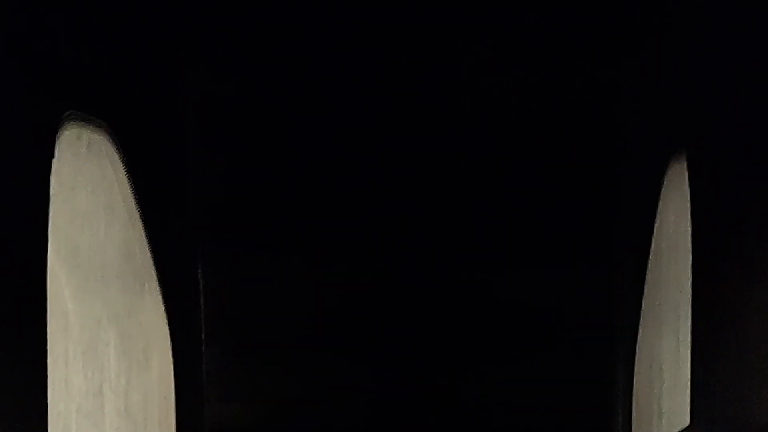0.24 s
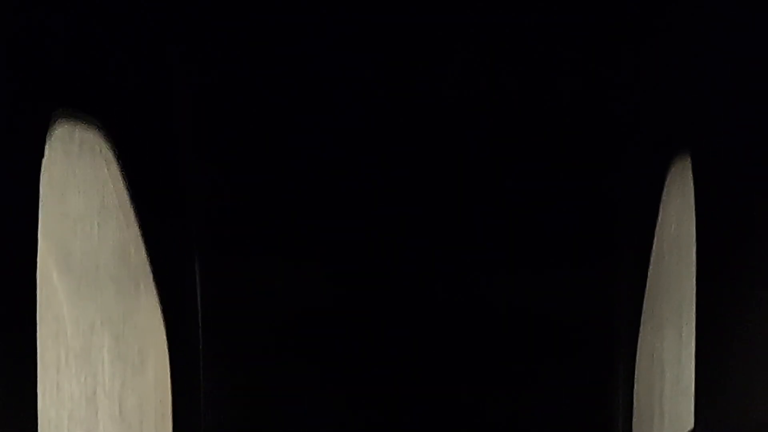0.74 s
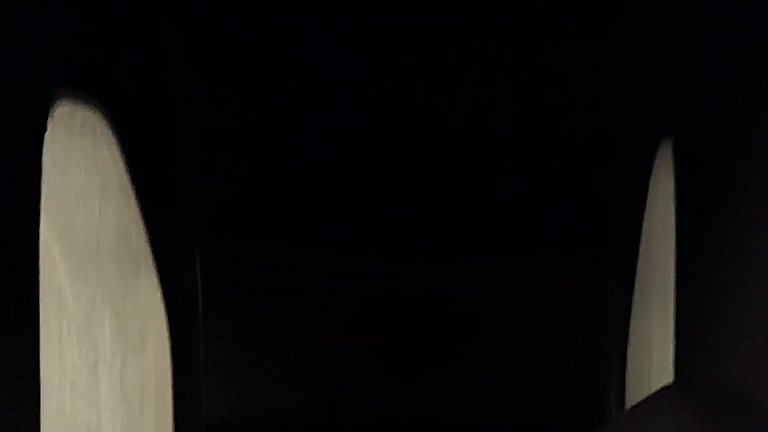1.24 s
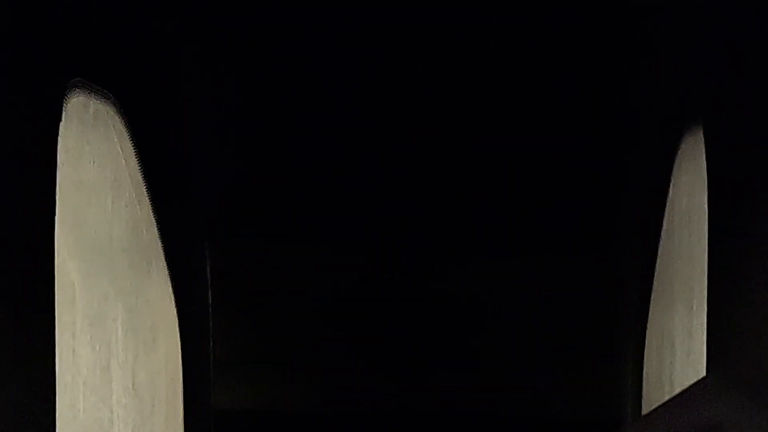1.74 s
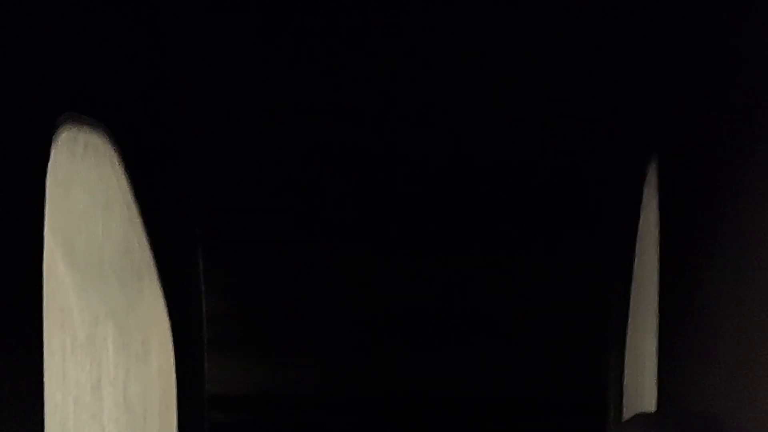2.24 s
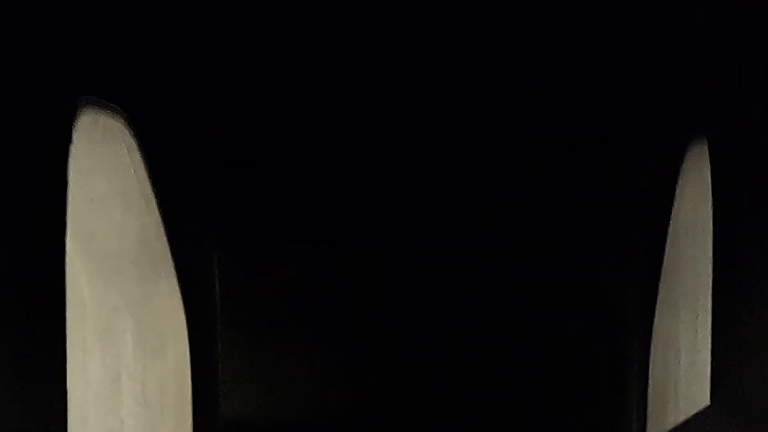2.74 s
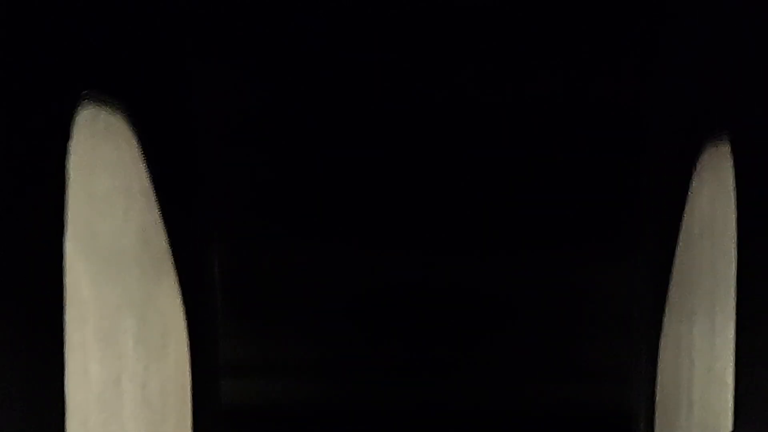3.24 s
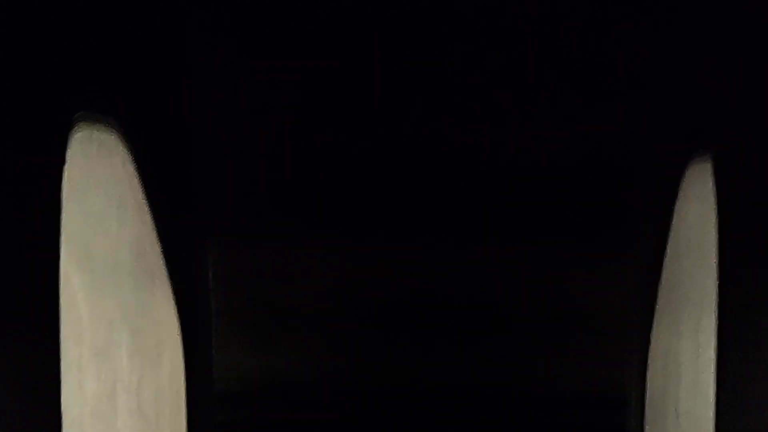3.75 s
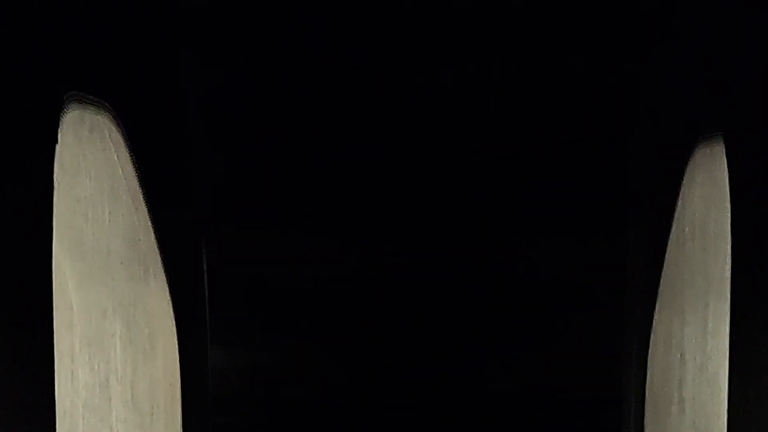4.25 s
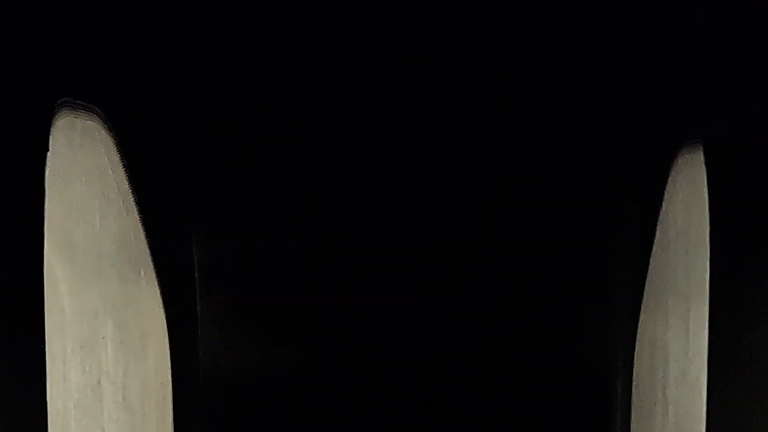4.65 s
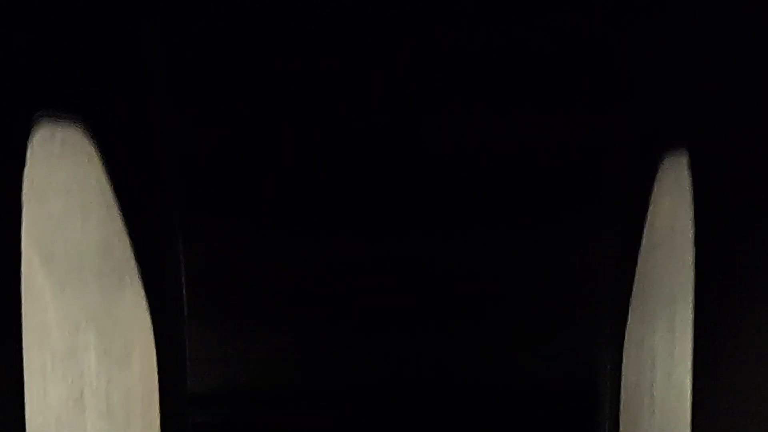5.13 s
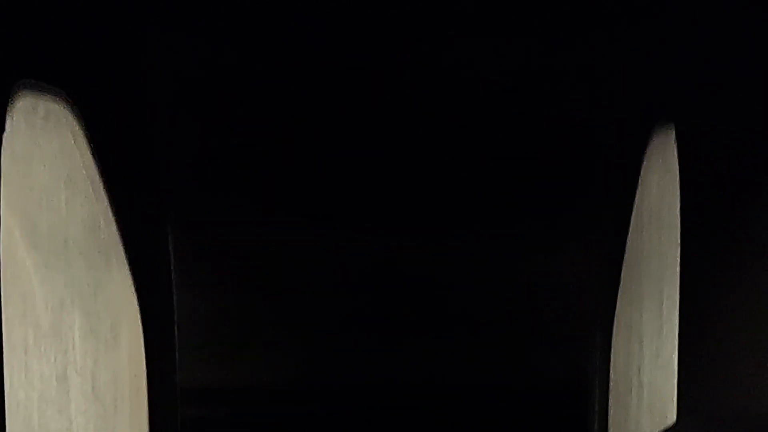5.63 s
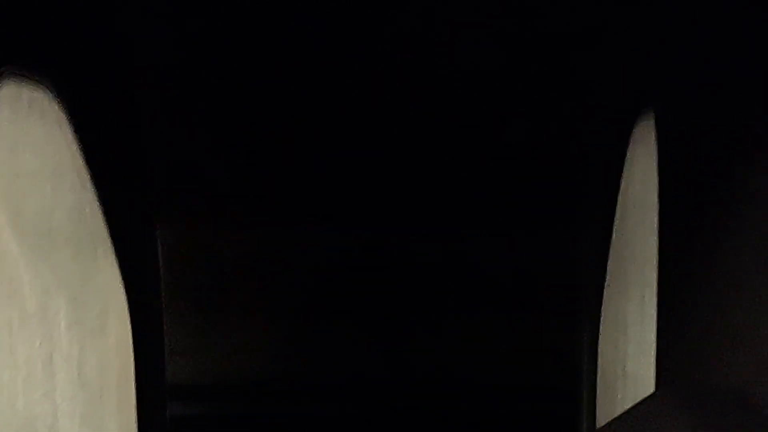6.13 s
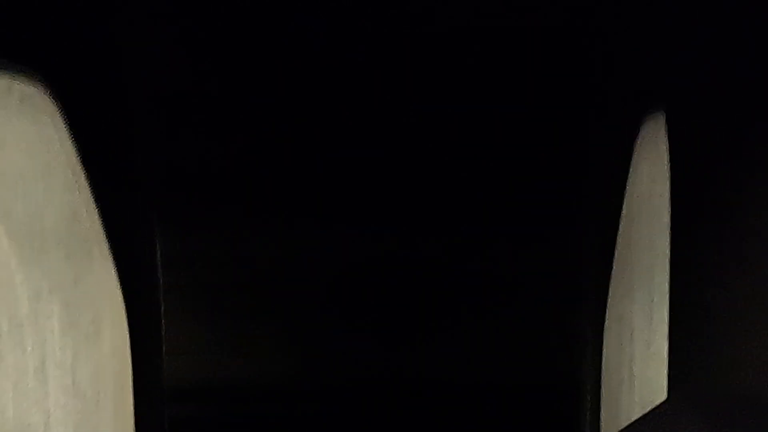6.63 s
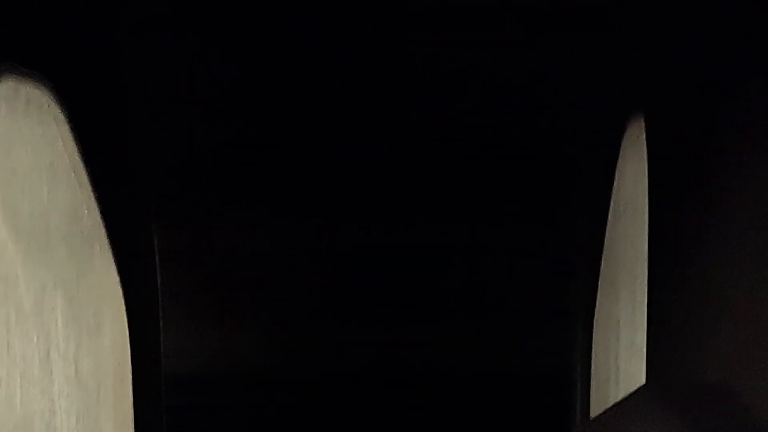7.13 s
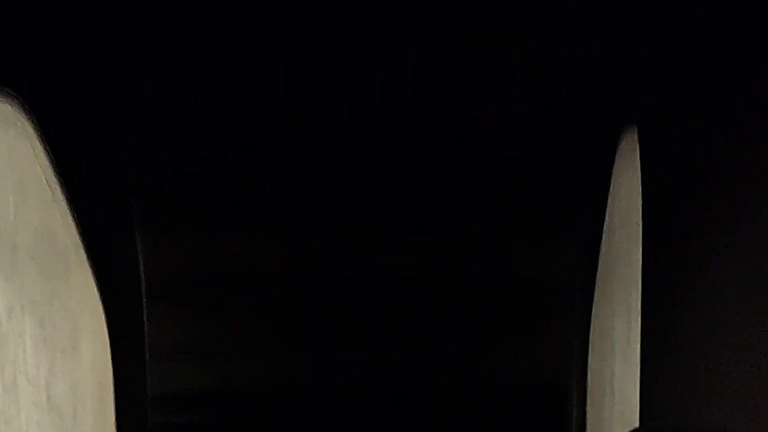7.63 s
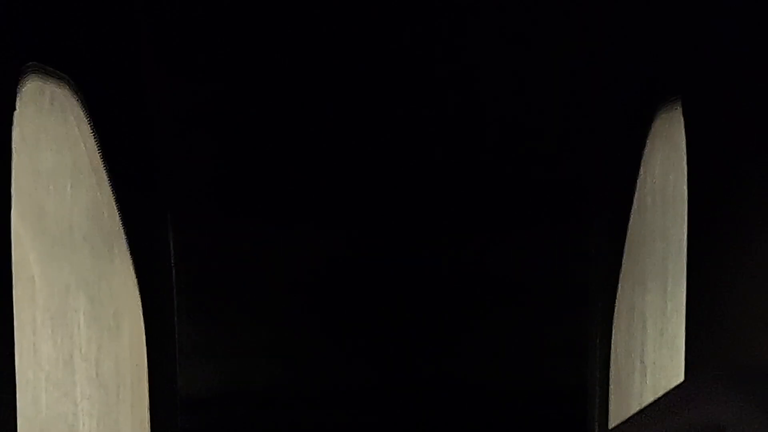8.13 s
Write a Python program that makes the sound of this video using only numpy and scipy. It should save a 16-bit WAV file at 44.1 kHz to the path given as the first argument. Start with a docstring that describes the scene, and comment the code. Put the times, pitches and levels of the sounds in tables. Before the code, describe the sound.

A train car interior rushing through a dark tunnel, deep bogie rumble, steady roar, wavering metallic whine, motor hum and sharp loose rattles.

```python
"""Bogie rumble and tunnel roar fill a subway car running at speed: shaped noise that rises and falls in short swells.
The floor drums, car body resonances boom, and rough rail excites wheel ring, contact hiss and short sung streaks.
A thin fluttering drive whine holds near 1.9 kHz over a grainy motor hum and a rail drone in narrow noise bands.
Hollow howls, also narrow noise bands, swell and fade; loose fittings rattle as noise cracks and short buzzes."""
import sys
import numpy as np
from scipy import signal
from scipy.fft import rfft, irfft, next_fast_len
from scipy.io import wavfile
from scipy.ndimage import uniform_filter1d, minimum_filter1d

SR = 44100
rng = np.random.default_rng(int(sys.argv[2]) if len(sys.argv) > 2 else 0)


def materialize(psi):
    """Save the field psi as 16-bit PCM at rate SR to the path in sys.argv[1].

    A 1-D psi becomes a single channel; in a 2-D psi each row is a channel.
    """
    bounded = np.clip(np.atleast_2d(psi).T, -1, 1)
    quanta = np.round(bounded * 32767).astype(np.int16)
    wavfile.write(sys.argv[1], SR, quanta)


N = 369558
TIME = np.arange(N) / SR  # s
FFT_SIZE = 2 * next_fast_len(N // 2 + 1, real=True)
BIN_HZ = np.maximum(np.arange(FFT_SIZE // 2 + 1) * SR / FFT_SIZE, 1)


def from_db(db):
    """Decibels to gain."""
    return 10 ** (np.asarray(db) / 20)


def rms_one(x):
    """Scale to unit power."""
    return x / np.sqrt(np.mean(x ** 2) + 1e-20)


def filtered(x, gain):
    """Apply a gain at each frequency."""
    return irfft(rfft(x, FFT_SIZE) * gain, FFT_SIZE)[:N]


def noise(gain):
    """Unit-power noise shaped by a gain at each frequency."""
    return rms_one(filtered(rng.standard_normal(FFT_SIZE), gain))


def colour(points):
    """Gain at each frequency from a short spectrum; silent above its last point."""
    hz, db = np.transpose(points)
    return from_db(np.interp(np.log(BIN_HZ), np.log(hz), db, right=-np.inf))


def resonance(hz, width_hz):
    """Gain of a steep-sided resonance, 12 dB down at width_hz either side."""
    return 1 / (1 + ((BIN_HZ - hz) / width_hz) ** 2) ** 2


def drift(rate_hz):
    """Low-passed random fluctuation with spread 1."""
    return noise(resonance(0, rate_hz))


def steadied(x, seconds, share):
    """Take a share of the chance swells out of a noise, so that its drive sets the level."""
    power = uniform_filter1d(x ** 2, max(int(seconds * SR), 1))
    power = uniform_filter1d(power, size=600) + 1e-9
    return rms_one(x / power ** (np.clip(share, 0, 1) / 2))


def in_time(rows):
    """One curve per column, joined by straight lines."""
    s, *columns = np.transpose(rows)
    return [np.interp(TIME, s, c) for c in columns]


def level(rows, offset_db):
    """Gain over time from a level curve and an offset in dB."""
    return from_db(in_time(rows)[0] + offset_db)


def swell(middle_s, half_s):
    """A smooth rise and fall, 1 at its middle."""
    return np.cos(np.pi / 2 * np.clip((TIME - middle_s) / half_s, -1, 1))


def narrow_band(hz, width_hz):
    """Noise in a narrow band around a pitch that may move."""
    phase = 2 * np.pi * np.cumsum(hz) / SR
    return drift(width_hz) * np.cos(phase) + drift(width_hz) * np.sin(phase)


def tone(hz, waver_hz, flutter_db):
    """A wavering tone of unit power; shifting tunnel reflections make it flutter."""
    phase = 2 * np.pi * np.cumsum(hz + waver_hz * drift(26.1)) / SR
    return rms_one(np.sin(phase) * from_db(flutter_db * drift(20)))


# hollow howls and booms:
# (middle [s], half length [s], pitch [Hz], glide [Hz/s], width [Hz], level [dB])
HOWLS = [(1.15, 0.59, 1185, -0.5, 82, -34.5), (1.45, 0.91, 300, 0, 110, -25.5),
         (4.83, 0.46, 655, -1.5, 40, -31), (4.96, 0.8, 1218, -25, 22, -38),
         (5.31, 0.23, 195, 1, 134, -21.5), (6.2, .6, 1100, -200, 190, -36),
         (7.33, 1.9, 975, -0.5, 110, -32.5), (6.85, 0.38, 950, -2, 14, -33),
         (7.75, 0.398, 1010, 0, 160, -34.5), (7.347, 0.422, 170, 0, 31, -24.5)]


def howls():
    """Some stretches of tunnel howl in a narrow band, which may slide down as the train runs through."""
    out = 0
    for middle_s, half_s, hz, glide_hz_per_s, width_hz, db in HOWLS:
        pitch_hz = hz + glide_hz_per_s * np.clip(TIME - middle_s, -half_s, half_s)
        band = steadied(narrow_band(pitch_hz, width_hz), seconds=0.11, share=0.42)
        out = out + from_db(db) * swell(middle_s, half_s) * band
    return out


# motor hum: (time [s], pitch [Hz], level [dB])
MOTOR_HUM = [(0, 581, -32), (0.9, 581, -33.5), (1.5, 581, -37), (3.7, 583, -37), (4.5, 585, -31.5),
             (5.3, 585, -44), (6.2, 587, -32.5), (7.2, 587, -39), (7.7, 588, -28), (8.38, 587, -44)]


def motor_hum(level_db, width_hz):
    """The motors hum on a narrow line that tunnel reflections break into grains."""
    hz, db = in_time(MOTOR_HUM)
    return from_db(db + level_db) * steadied(narrow_band(hz, width_hz), seconds=.2, share=.8)


# gear mesh whine: (time [s], pitch [Hz], level [dB])
DRIVE_WHINE = [(0, 1870, -44), (1.2, 1873, -38.5), (2.85, 1873, -36.5), (3.3, 1890, -41), (4.1, 1876, -43),
               (4.5, 1876, -32.5), (5.0, 1867, -35), (6.2, 1887, -39.5), (6.7, 1866, -34), (7.1, 1887, -48),
               (7.7, 1896, -37), (8.38, 1880, -49)]


def drive_whine(waver_hz, flutter_db):
    """Gear teeth mesh at a pitch tied to speed."""
    hz, db = in_time(DRIVE_WHINE)
    return from_db(db) * tone(hz, waver_hz, flutter_db)


# jolts of loose fittings: (time [s], crack [dB], buzz [dB], buzz t60 [s])
RATTLES = [(0.382, -28, -31, .05), (0.695, -25, -29, .05), (1.064, -24, -26, .08), (1.119, -27, -25, 0.089),
           (1.555, -28, -25, .06), (1.588, -20, -23.5, .07), (2.492, -23, -28, .04), (3.09, -29, -26, .07),
           (3.328, -29, -25, .06), (3.382, -24, -25, .06), (3.448, -20, -30, .04), (3.841, -23, -25, .05),
           (3.897, -19, -31, .04), (4.11, -26, -19, .05), (4.201, -24, -27, .04), (5.083, -22, -26, .08),
           (6.471, -27, -24, .07), (6.86, -20, -28, .07), (6.984, -25, -25, .07), (7.037, -23, -26, .036),
           (7.058, -12, -25, 0.076), (7.062, -22, -30, .03), (7.077, -27, -30, .04),
           (7.0871, -15, -28, 0.031), (7.282, -20, -29, .07), (7.504, -22, -26, 0.076)]
# resonances of the fittings: (frequency [Hz], width [Hz], level [dB])
FITTING_MODES = [(1350, 640, 13), (2620, 880, 4), (3790, 390, -7.5), (4800, 520, -10.5), (5960, 520, -19),
                 (7900, 1400, -35)]


def rattles(buzz_db, crack_db, crack_t60_s, crack_tilt_db_per_octave):
    """Each jolt starts with a bright crack and sets off a short buzz of contacts in the fittings."""
    crack_env, buzz_env = np.zeros((2, N))
    after_s = TIME[:SR // 4]
    for s, crack, buzz, buzz_t60_s in RATTLES:
        start = int(s * SR)
        span = slice(start, start + len(after_s))
        crack_env[span] += from_db(crack + crack_db - 60 * after_s / crack_t60_s)
        buzz_env[span] += from_db(buzz + buzz_db - 60 * after_s / buzz_t60_s)
    modes = sum(from_db(db) * resonance(hz, width_hz) for hz, width_hz, db in FITTING_MODES)
    bright = modes * from_db(crack_tilt_db_per_octave * np.log2(BIN_HZ))
    cracks = filtered(crack_env * rng.standard_normal(N), rms_one(bright))
    buzzes = filtered(buzz_env * rng.standard_normal(N), rms_one(modes))
    return cracks + buzzes


# rippled rail, louder on worn stretches: (time [s], level [dB])
CORRUGATION_LEVEL = [(0, -41), (.45, -28.5), (1.5, -40), (2.5, -33.5), (3.6, -52), (4.65, -18.5),
                     (5.4, -43), (6.4, -34), (7.2, -44), (7.7, -28.5), (8.3, -27)]
CORRUGATION_HZ, CORRUGATION_WIDTH_HZ = 583, 95


def rail_drone(level_db):
    """Ripples on the rail head shake the wheels in a narrow, wavering band."""
    band = noise(resonance(CORRUGATION_HZ, CORRUGATION_WIDTH_HZ))
    return level(CORRUGATION_LEVEL, level_db) * steadied(band, seconds=0.068, share=0.67)


# wheel modes that sing out: (frequency [Hz], level [dB])
WHEEL_MODES = [(1805, -44), (1855, -41.5), (1905, -40), (1955, -41.5)]
# wheel ring, also used by wheels(): (time [s], level [dB])
RING_LEVEL = [(0.0, -25), (0.3, -25), (0.6, -27.5), (0.9, -24.5), (1.2, -26.5), (1.4, -24.5), (1.6, -27),
              (2.2, -24.5), (3.3, -24.5), (4.3, -25.5), (4.5, -24.5), (5.2, -25.3), (6.6, -25),
              (7.3, -26.5), (8.3, -26)]


def wheel_song(level_db, waver_hz, flutter_db):
    """Each wheel mode flares up briefly by itself, more strongly while the wheels ring loudly."""
    ring_db, = in_time(RING_LEVEL)
    song = sum(from_db(db) * tone(hz, waver_hz, flutter_db) for hz, db in WHEEL_MODES)
    return from_db(level_db + ring_db - ring_db.mean()) * song


# relative spectra of tunnel roar, wheel ring, contact hiss: (frequency [Hz], density [dB per Hz])
ROAR_SPECTRUM = [(200, -2), (340, -1.5), (440, -2.5), (560, -0.5), (780, -0.5), (900, -4), (1030, -6.5),
                 (1230, -7), (1450, -12.5), (1700, -18), (2400, -26.5), (5000, -69)]
RING_SPECTRUM = [(900, -34), (1400, -20.5), (1600, -5), (1760, -0.5), (1900, -1.5), (1980, 0), (2090, -5),
                 (2200, -10), (2400, -15), (3000, -41.5), (6000, -74)]
HISS_SPECTRUM = [(1200, -15), (2300, 0), (2800, 0), (3300, -1.5), (3750, 1), (4100, -6), (4550, -13),
                 (5200, -15.5), (5900, -16.3), (6700, -23), (7900, -27.7), (9100, -37.5), (11200, -45),
                 (12800, -53)]
# tunnel roar and contact hiss along the line: (time [s], level [dB])
ROAR_LEVEL = [(0.0, -20.5), (0.4, -18.5), (1.3, -19), (2.5, -19), (3.1, -20), (4.4, -20), (4.7, -20.5),
              (5.3, -20), (5.9, -19), (7.4, -20), (7.7, -19), (8.3, -18.5)]
HISS_LEVEL = [(0.0, -37.0), (1.1, -35), (1.3, -36.5), (2.0, -36.5), (3.4, -35), (4.4, -36), (4.7, -34.5),
              (4.9, -37.5), (5.1, -35.5), (5.7, -37), (5.9, -36.5), (6.9, -35), (7.0, -34.5), (7.3, -35.3),
              (7.5, -34.5), (8.3, -36)]
# roar above the split, falling away toward the end: (time [s], level change [dB])
ROAR_TOP_LEVEL = [(0, 1), (1.2, -1), (1.8, -1.5), (3, 0.5), (6.3, 1), (7.3, -0.5), (8.3, -3)]
ROAR_SPLIT_HZ = 1100


def wheels(roar_db, ring_db, hiss_db, judder_db, grit_db, patchy_db, ring_sway_db):
    """Rail roughness drives roar, ring and hiss together; the ring also sways, fine grit roughens the hiss."""
    rough_db = judder_db * drift(45) + patchy_db * drift(14)

    roar = steadied(noise(colour(ROAR_SPECTRUM)), seconds=0.066, share=0.2)
    roar = level(ROAR_LEVEL, roar_db + rough_db) * roar
    roar_top = filtered(roar, 1 / (1 + (ROAR_SPLIT_HZ / BIN_HZ) ** 10))
    roar = roar + (level(ROAR_TOP_LEVEL, 0) - 1) * roar_top

    ring = steadied(noise(colour(RING_SPECTRUM)), seconds=0.068, share=0.25)
    ring = level(RING_LEVEL, ring_db + rough_db + ring_sway_db * drift(5.1)) * ring

    hiss_gain = level(HISS_LEVEL, hiss_db + rough_db + grit_db * drift(160))
    return roar + ring, hiss_gain * noise(colour(HISS_SPECTRUM))


# relative spectra of bogie rumble and floor drumming: (frequency [Hz], density [dB per Hz])
RUMBLE_SPECTRUM = [(5, -21), (15, -4), (30, -0.5), (60, 1), (105, -1), (140, -8), (220, -16.5),
                   (500, -72.5)]
FLOOR_SPECTRUM = [(70, -30.5), (110, -0.5), (150, 1.5), (200, 1), (240, -1), (310, 0.5), (380, -4.5),
                  (480, -8.5), (900, -58.5)]
# bogie rumble and floor drumming along the line: (time [s], level [dB])
RUMBLE_LEVEL = [(0.0, -20), (0.6, -15.5), (1.6, -17.5), (1.8, -17.5), (2.6, -16.5), (3.7, -17), (6.0, -17),
                (6.2, -15.5), (6.9, -16.5), (7.4, -17.5), (7.7, -16), (8.3, -18)]
FLOOR_LEVEL = [(0.0, -14.5), (0.7, -19.5), (1.7, -17.5), (2.0, -27.5), (2.2, -17.5), (2.7, -23.5),
               (3.4, -16), (3.7, -18), (5.0, -17.5), (5.3, -16.5), (6.5, -18.5), (7.1, -18.5), (8.0, -18),
               (8.3, -18.5)]
# narrow car body resonances: (frequency [Hz], width [Hz], level [dB rms])
CAR_MODES = [(60, 13, -31.5), (87.5, 8.1, -36.5), (257.4, 7.3, -36), (450, 19, -41.5), (526, 16, -38.5),
             (627.5, 14, -40.5)]


def car_body(rumble_db, floor_db, sway_db):
    """Uneven track shakes the bogies and the floor; the shell booms at its own resonances."""
    rumble = steadied(noise(colour(RUMBLE_SPECTRUM)), seconds=.1, share=0.94)
    rumble = level(RUMBLE_LEVEL, rumble_db + sway_db * drift(9.1)) * rumble
    floor = steadied(noise(colour(FLOOR_SPECTRUM)), seconds=0.089, share=0.37)
    floor = level(FLOOR_LEVEL, floor_db + sway_db * drift(15)) * floor
    boom = sum(from_db(db) * noise(resonance(hz, width_hz)) for hz, width_hz, db in CAR_MODES)
    return rumble + boom, floor


def swells_db(rows):
    """A run of short swells, each with its own length and a height for every layer."""
    return sum(np.outer(db, swell(s, half_s) ** 2) for s, half_s, *db in rows)


# brief level swells, signed: (time [s], half length [s], rumble [dB], floor [dB], roar [dB])
SWELLS = [(0.1, 0.054, 3, 1, 0.31), (0.19, .03, -2, 4, -0.12), (0.47, .07, 3.5, -3, 1.5),
          (0.65, 0.034, -1, 2, 1.5), (1.64, 0.1, 4, 6, -0.25), (1.87, .05, -2, 8, 0.16),
          (2.152, 0.03, -2, 2, 0.28), (2.53, 0.06, 4, 2, 0), (2.725, .05, 3, 0, 0.34),
          (2.87, .06, 1.5, 4, -0.71), (3.08, .06, 3, -4, 0.12), (3.427, 0.089, 2.5, 3.5, -0.68),
          (4.265, .06, 1, 2, -0.64), (4.638, .035, 5, 1, -0.19), (4.812, .035, 1, 2.5, -0.15),
          (5.09, .06, 5, 2, -0.12), (5.254, .04, -1, 8, 0), (5.335, 0.034, 1, 2, 0), (5.61, 0.044, 1, 0, 0),
          (6.321, 0.034, 0, 0, 0.16), (6.879, 0.031, 4, 5, -0.25), (7.022, .035, 4, 3, 0),
          (7.73, 0.06, 1.5, -5, 0.66), (7.799, .025, 6.5, 3, -0.69), (8.22, 0.067, -9, 6.5, -1.1)]
# brief level dips, signed depths:
# (time [s], half length [s], rumble [dB], floor [dB], roar [dB], hiss [dB])
LULLS = [(0.15, 0.04, 3, 1.8, 2.5, 2), (0.565, 0.029, 2, 5, 5, 4.5), (1.73, 0.12, 9, 3.3, 0.5, 1),
         (1.975, 0.036, 10, 5, 1.5, 3), (2.39, 0.035, 1, 3, 1, 2), (2.77, 0.044, 2, 3, 1.5, 2),
         (3.24, .04, 10, 2, -0.5, -0.5), (3.54, 0.044, 6, 1, 0, 0), (3.92, 0.023, 3, 3.7, 3.5, 2),
         (4.43, 0.062, 6, 3.3, 0.5, 0.5), (5.16, 0.034, 3.5, 4, 1.5, 2), (5.71, .05, 2, 1, -0.5, 1),
         (6.58, .07, 4, 3.8, -0.5, -1), (7.45, 0.049, 4, 3.1, 1, 1.5), (7.83, 0.041, 6, 3.5, 2, 2),
         (8.02, 0.13, 1, 6.4, 0.8, -0.5)]


def ride_gains():
    """Rumble, floor and roar levels rise and fall briefly; short lulls shift these and the hiss."""
    *dips_db, hiss_dip_db = swells_db(LULLS)
    rumble_gain, floor_gain, roar_gain = from_db(swells_db(SWELLS) - dips_db)
    return rumble_gain, floor_gain, roar_gain, from_db(-hiss_dip_db)


def scene():
    """Everything as heard at one spot inside the car."""
    ringing = howls() + rail_drone(level_db=-9.0)
    ringing = ringing + wheel_song(level_db=-1.5, waver_hz=10.82, flutter_db=3.5)
    motors = motor_hum(level_db=-0.8, width_hz=9) + drive_whine(waver_hz=4.2, flutter_db=4.0)
    loose = rattles(buzz_db=0.5, crack_db=-3.0, crack_t60_s=0.0086, crack_tilt_db_per_octave=3.0)
    rolling, hiss = wheels(roar_db=-1.1, ring_db=-4.0, hiss_db=-2.5, judder_db=0.62,
                           grit_db=0.65, patchy_db=0.38, ring_sway_db=0.6)
    rumble, floor = car_body(rumble_db=-2.0, floor_db=-5.5, sway_db=1.0)

    rumble_gain, floor_gain, roar_gain, hiss_gain = ride_gains()
    ride = rumble_gain * rumble + floor_gain * floor + hiss_gain * hiss
    ride = ride + roar_gain * (rolling + ringing + motors)
    return (ride + loose)[None]


def limiter(x, ceiling, size):
    """The gain ducks smoothly around any peak above the ceiling; size in samples."""
    gain = minimum_filter1d(np.minimum(1, ceiling / (np.abs(x) + 1e-9)), 2 * size)
    return x * uniform_filter1d(uniform_filter1d(gain, size), size)


CUTOFF_HZ = 12900


def record(dry):
    """Hold down the highest peaks, fade in over 3 ms and cut the top steeply."""
    held = limiter(dry, ceiling=0.63, size=150) * np.minimum(TIME / .003, 1)
    low_pass = signal.cheby1(12, .1, CUTOFF_HZ, fs=SR, output="sos")  # 0.1 dB ripple
    return signal.sosfilt(low_pass, held)


dry = scene()
out = record(dry)
materialize(out)
```